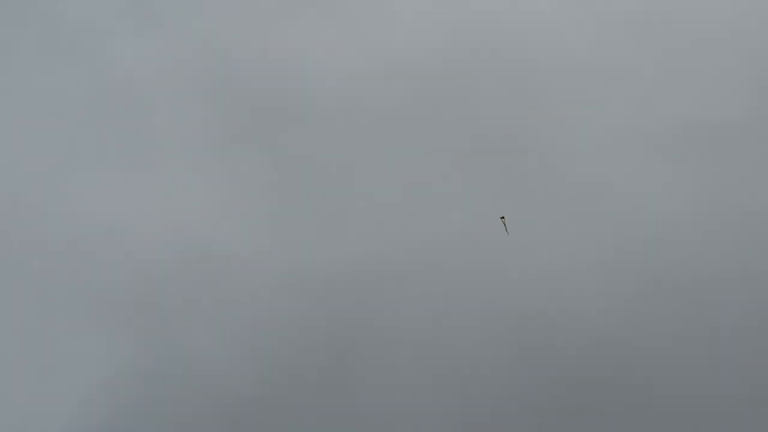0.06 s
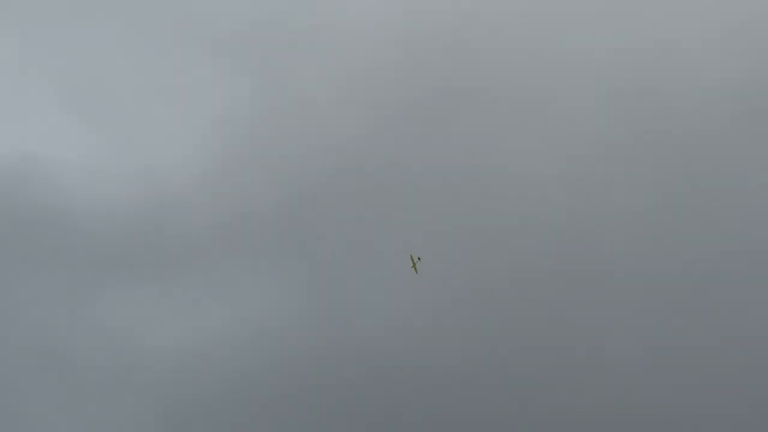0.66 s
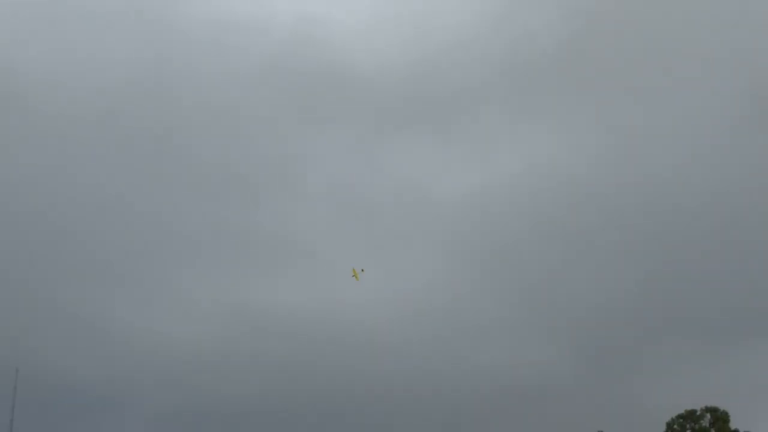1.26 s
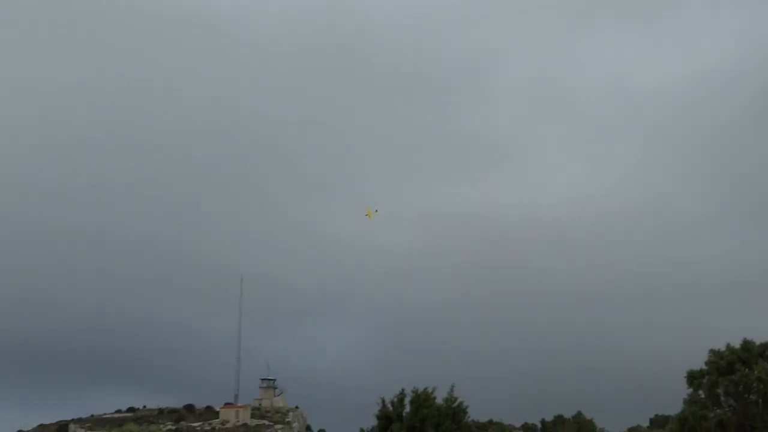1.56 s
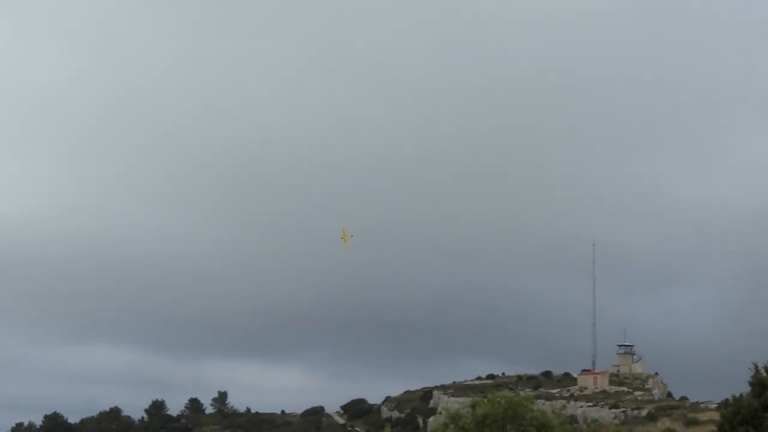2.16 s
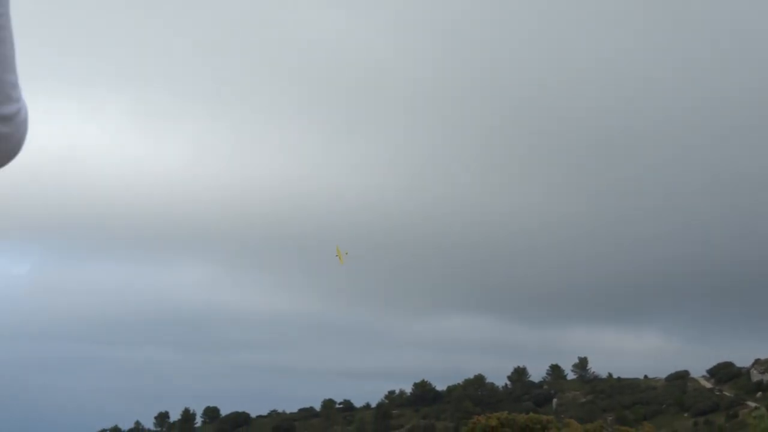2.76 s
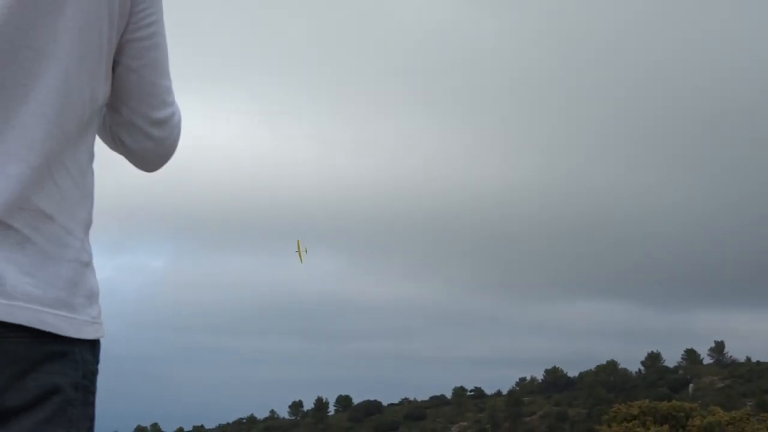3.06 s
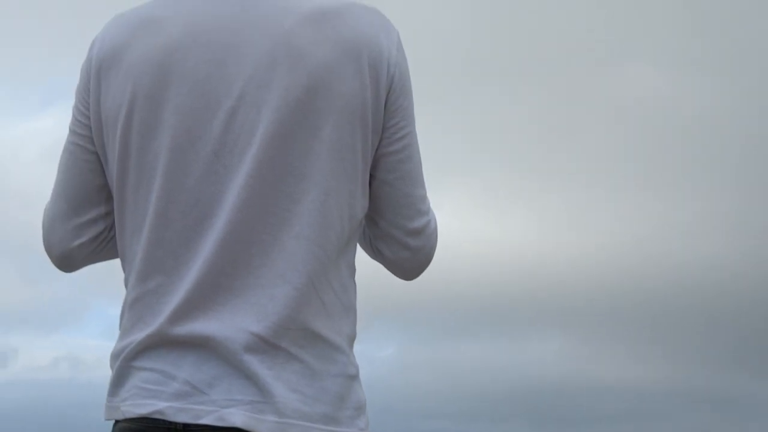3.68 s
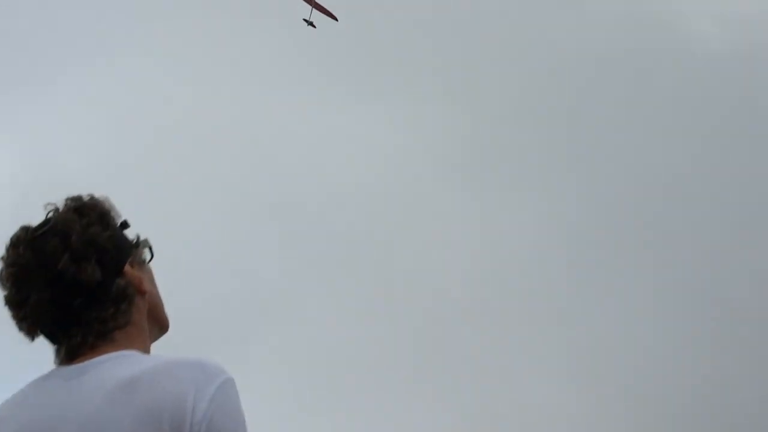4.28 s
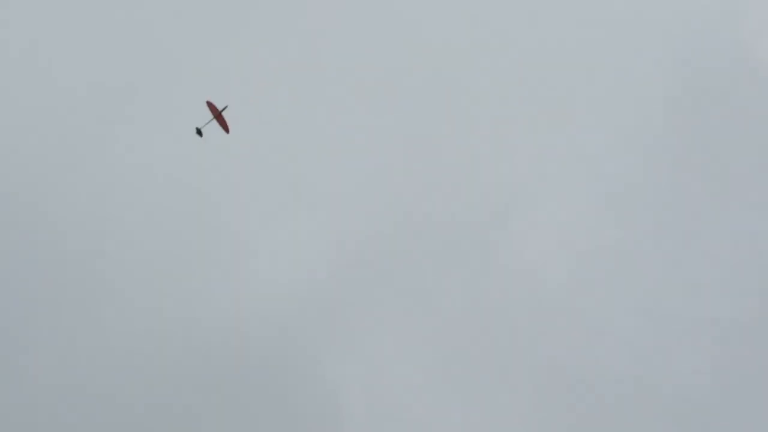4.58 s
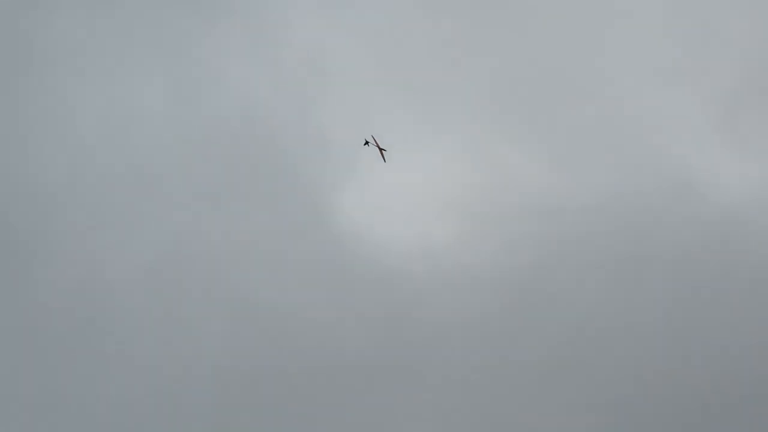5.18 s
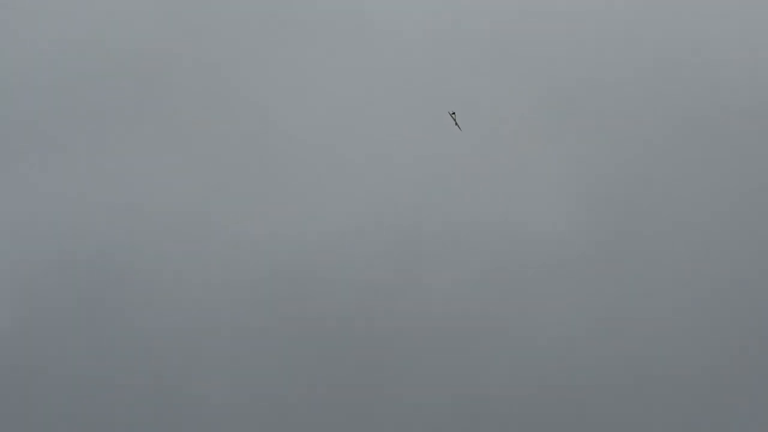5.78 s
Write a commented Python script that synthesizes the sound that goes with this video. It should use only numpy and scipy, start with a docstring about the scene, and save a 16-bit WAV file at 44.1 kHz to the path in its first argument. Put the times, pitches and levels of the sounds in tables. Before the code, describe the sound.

Outdoors on a quiet hilltop, short high whistles flicker through the soft swish of a distant model glider. A light rustle, shoe scuffs and clicking pebbles come from near the microphone. The glider's hiss surges, then swells into an overhead whoosh with a brief low hum and a few sharper stone clacks, before thinning back to faint whistles in the breeze.

```python
"""A model glider swoops past

A model glider circles over an open hilltop, dives, and whooshes past overhead with a brief low hum.
Swirls of air peel off its wings as a hiss that follows its speed and surges now and then; slots in
its body whistle thinly. Close by, over a faint breeze, come a soft shuffling rustle, shoe scuffs
and small dry clacks, probably loose stones underfoot."""
import sys
import numpy as np
from scipy import signal
from scipy.fft import rfft, irfft, next_fast_len
from scipy.io import wavfile
from scipy.ndimage import uniform_filter1d, map_coordinates

SR = 44100
rng = np.random.default_rng(int(sys.argv[2]) if len(sys.argv) > 2 else 0)


def inscribe(sig):
    """Save sig as 16-bit PCM at rate SR to the path in sys.argv[1].

    A 1-D sig is mono; a 2-D sig holds one channel per row.
    Samples are clipped to [-1, 1] before scaling.
    """
    pcm = np.round(np.clip(np.atleast_2d(sig).T, -1, 1) * 32767)
    wavfile.write(sys.argv[1], SR, pcm.astype(np.int16))


N = 266231

# swirls off the wings as the glider circles, dives and climbs (time [s], level [dB], centre [Hz])
SWIRLS = [(0.0, -56, 3440), (0.33, -64, 3630), (0.53, -55.5, 3210), (0.85, -67, 2990), (1.16, -57, 3220),
          (1.35, -56.5, 4000), (1.7, -66, 3560), (2.0, -67.5, 4360), (2.24, -61, 3850), (2.48, -72.5, 3970),
          (2.7, -54.5, 3330), (2.9, -55, 4070), (3.45, -46.5, 4150), (3.6, -55.5, 4180), (3.8, -73.5, 4080),
          (4.0, -54.5, 3800), (4.25, -49, 3590), (4.45, -48.5, 4000), (4.8, -51.5, 3400),
          (4.97, -54.5, 3210), (5.27, -56.5, 3190), (5.5, -77.5, 2950), (5.7, -53, 2920), (6.04, -63, 3150)]
# tone colour of the swirls when centred on SWIRL_HZ (frequency [Hz], level [dB])
SWIRL_COLOUR = [(1200, -40), (2100, -21.5), (2550, -13.5), (2900, -4.5), (3300, 0.5), (3900, -1.5),
                (4500, -11.5), (5300, -22), (7000, -26), (11000, -73)]
# hiss of rough air along the glider's skin (time [s], relative level [dB], treble lift [dB/octave])
HISS = [(0.0, -64, 7), (0.14, -65.5, 15), (0.34, -68.5, 17), (0.48, -74, 16), (1.08, -77.5, 22),
        (1.3, -63.5, 5), (1.62, -78, 20), (2.0, -75.5, 14), (2.2, -62, -4), (2.65, -55, -6),
        (3.3, -52, -2.5), (3.47, -44.5, 4), (3.62, -55.5, 4), (3.8, -63, -8.5), (4.2, -49.5, -2.5),
        (4.37, -40.5, 15), (4.55, -40, 12), (4.7, -45, 4.5), (4.82, -42.5, -1), (5.0, -50, 3),
        (5.2, -55, 5.5), (5.45, -64.5, 20), (6.04, -65.5, 7.5)]
# tone colour of that hiss (frequency [Hz], level [dB])
HISS_COLOUR = [(2500, -58), (4200, -4), (5000, 3), (5600, 2), (6400, -0.5), (7200, -6), (7900, -10.5),
               (9200, -14), (10200, -24.5), (11500, -35), (13000, -44), (16000, -76)]
# brief swells and dips, probably as the glider banks (time [s], half length [s], change [dB])
SURGES = [(0.423, 0.047, -8.5), (0.753, 0.022, 2), (0.923, .025, 4), (0.99, 0.037, 5.5),
          (1.093, 0.042, -6.5), (1.53, 0.037, -4.5), (1.966, 0.017, 4.5), (2.047, 0.041, -8),
          (2.213, 0.017, 2), (2.486, 0.044, -2), (2.585, .025, 4), (2.674, 0.0098, 4), (2.735, 0.01, -6),
          (2.835, 0.024, 1.5), (2.882, 0.014, -4.5), (2.924, 0.029, 5), (3.036, 0.018, 0.5),
          (3.12, 0.06, -8.5), (3.183, 0.018, 8), (3.345, 0.019, -4.5), (4.055, 0.041, -0.5),
          (4.271, 0.028, 2), (4.323, 0.011, -5), (4.75, 0.013, -4), (4.806, 0.025, 2.5), (5.136, 0.021, -4),
          (5.234, 0.024, 6), (5.41, 0.051, -5)]
# faint low rush, with a soft shuffling rustle from about 2 to 4 s, probably feet or clothing
# (time [s], level [dB], bass lift [dB/octave])
FAINT_RUSH = [(0.0, -65.5, 0), (0.8, -71.5, -4.5), (1.33, -65.5, -5.5), (1.65, -70.5, -4.5),
              (2.1, -66.5, 1.5), (2.8, -67.5, 2), (3.3, -69.5, 1), (3.75, -73, 3.5), (4.2, -79, -2.5),
              (4.9, -70, -2.5), (5.3, -70, -2), (6.04, -70, -5)]
# tone colour of the rush, also used for a stone's scatter (frequency [Hz], level [dB])
RUSH_COLOUR = [(30, -60), (100, -38), (180, -21.5), (350, -11.5), (600, -5.5), (850, -5), (1250, 2.5),
               (1700, 1.5), (2300, 3.5), (3300, -4), (5000, -2.5), (10000, -58)]
# how alike the glider sounds in both ears (frequency [Hz], likeness [0 to 1])
GLIDER_LIKENESS = [(100, 0.99), (300, 1), (750, 0.81), (1300, 0.93), (2500, 0.93), (4000, .982), (6500, 1),
                   (9000, 1), (12000, 0.75)]
# thin gliding whistles, and one brief low hum as the glider passes overhead
# (start [s], length [s], first pitch [Hz], glide [Hz], level [dB])
WHISTLES_AND_HUM = [(0.0, 0.29, 3346, -64.5, -57), (0.06, 0.23, 2410, 39, -68),
                    (0.066, 0.094, 3660, 66, -60), (0.105, 0.1, 5160, 0, -57.5), (0.2, 0.12, 5120, 11, -69),
                    (0.2, 0.23, 3730, -20, -63), (0.317, 0.067, 3700, -22, -57.5),
                    (0.419, 1.32, 4660, -10.5, -65.5), (0.46, 0.11, 4640, 22, -63.5),
                    (0.66, 0.15, 2898, -54, -55), (0.75, 0.15, 2717, 8, -59.5), (0.8, 0.17, 2870, 73, -55),
                    (0.883, 0.11, 4640, 18, -55.5), (1.129, 0.097, 4610, -28, -58.5),
                    (1.259, 0.15, 4630, 152, -57.5), (1.3, 0.084, 3770, 86, -52),
                    (1.366, 0.064, 5300, 30, -61.5), (1.415, 0.073, 3830, -51, -55),
                    (1.448, 0.16, 4720, -40, -69.5), (1.606, 0.1, 3440, -100, -62.5),
                    (2.17, 0.21, 5130, 138, -66), (2.38, 0.063, 5430, 60, -62),
                    (2.49, 0.1, 5540, -160, -60.5), (2.662, 0.09, 5430, 32, -60),
                    (2.75, 0.062, 5550, 16, -53.5), (3.455, 0.13, 6230, -100, -53),
                    (3.447, 0.24, 3200, 41, -69.5), (3.616, 0.19, 6190, -39, -65),
                    (3.685, 0.16, 5560, -140, -72), (4.316, 0.24, 280, -36.5, -69),
                    (4.83, 0.14, 3254, -43, -52), (4.918, 0.15, 3060, 38, -58.5),
                    (4.891, 0.19, 5100, -69, -54.5), (5.16, 0.138, 4970, -200, -55.5),
                    (5.2, 0.11, 2290, -43, -56.5), (5.28, 0.13, 2207, -45, -58.5),
                    (5.276, 0.15, 3730, -82, -62), (5.29, 0.11, 2840, 57, -62),
                    (5.433, 0.12, 5440, -25, -62.5), (5.46, 0.53, 5140, 50, -65),
                    (5.5, 0.15, 4880, -220, -62.5), (5.621, 0.079, 4630, -20, -59),
                    (5.493, 0.17, 1790, -17, -64.5), (5.587, 0.097, 1773, 34, -56.5),
                    (5.668, 0.16, 2897, 0, -54.5), (5.683, 0.2, 2650, 12, -54.5),
                    (5.88, 0.24, 3275, -32, -61), (5.962, 0.16, 2465, -65, -52)]
# tone colour of the breeze (frequency [Hz], level [dB])
BREEZE_COLOUR = [(25, -25), (70, -7), (160, -2.5), (300, -5), (550, 3), (1100, 7.5), (2000, 4), (4000, -14),
                 (8000, -12), (12000, -17.5), (16000, -18.5)]
# how alike the breeze sounds in both ears (frequency [Hz], likeness [0 to 1])
BREEZE_LIKENESS = [(30, 0.47), (110, 1), (300, 0.61), (700, 0.65), (1500, 0.5), (4000, 0.2), (12000, 0.88)]
# balance of the glider and breeze (frequency [Hz], left minus right [dB])
SKY_BALANCE = [(300, -.3), (800, 0.4), (1300, 1), (2300, -0.91), (3400, -0.6), (4800, .3), (7000, 0),
               (12000, 0.22)]
# stone hits (time [s], relative knock [dB], relative grit [dB], favoured pitch [Hz],
# left minus right [dB])
CLACKS = [(1.791, -50, -42, 2350, -3), (1.822, -58, -57, 1830, -1), (1.9, -42.5, -42, 1030, 0.5),
          (2.03, -57.5, -55.5, 1270, -1), (2.271, -64, -68, 1210, 2), (2.279, -66, -68, 1200, -5),
          (2.337, -58, -53, 1220, -3), (2.457, -49, -35, 1450, 1), (2.529, -52, -68, 1470, 3),
          (2.69, -44.5, -37.5, 1750, 1.5), (2.81, -52, -65, 2570, 4), (3.12, -58, -43.5, 2300, -3),
          (3.171, -39, -34.5, 2650, -1.5), (3.282, -56, -47, 1370, -1), (4.006, -41, -31, 1280, 0.5),
          (4.352, -34, -27.5, 1800, 4), (4.391, -28.5, -23, 1880, 1.5), (4.512, -37.5, -40, 1310, 4),
          (4.544, -35.5, -37, 2980, 8), (4.547, -42, -24.5, 553, 1.5)]
# the tones a stone rings with (base pitch [Hz], relative level [dB], time to fade by 60 dB [s])
STONE_TONES = [(371, -23.5, 0.18), (596, -9.5, 0.078), (817, -4.5, 0.028), (1034, -3.5, 0.034),
               (1281, -2.5, 0.04), (1570, -3.5, 0.021), (1950, 0.5, 0.024), (2220, 11.5, 0.006),
               (3354, 2, 0.018)]
# tone colour of grinding grit (frequency [Hz], level [dB])
GRIT_COLOUR = [(600, -52), (2000, 13.5), (3200, 10), (5000, 14), (8000, 7.5), (10500, -2), (13000, -15.5),
               (16000, -29)]
# how alike stones and scuffs sound in both ears (frequency [Hz], likeness [0 to 1])
GROUND_LIKENESS = [(200, 0.99), (450, 1), (850, 0.44), (1300, 0.74), (2200, 0.64), (3000, 0.69),
                   (5000, 0.96), (12000, 0.88)]
# balance of the stones and scuffs (frequency [Hz], left minus right [dB])
GROUND_BALANCE = [(300, 0), (550, -3), (900, 3.5), (1200, 1.5), (1700, -2), (2300, -3), (3100, -5.5),
                  (5000, -2), (12000, 1)]
# scuffs of a sole (time [s], level [dB], length [s], centre [Hz])
SCUFFS = [(1.947, -68.5, 0.078, 580), (2.119, -66.5, 0.081, 750), (2.259, -72, 0.037, 306),
          (2.267, -56.5, 0.044, 1244), (2.34, -52, 0.021, 1224), (2.343, -66, 0.042, 358),
          (2.451, -53.5, 0.046, 1460), (2.53, -55, 0.018, 1390), (4.292, -64.5, 0.032, 387),
          (4.312, -57.5, 0.18, 694), (4.348, -52, 0.036, 371), (4.387, -50, 0.039, 382),
          (4.546, -40.5, 0.018, 586), (4.547, -50, 0.031, 354), (4.694, -58, 0.016, 230),
          (4.696, -56, 0.026, 550)]
# tone colour of a scuff centred on SCUFF_HZ (frequency [Hz], level [dB])
SCUFF_COLOUR = [(30, -24), (110, -20), (220, -12.5), (310, -2), (360, 13.5), (430, -3), (560, -2.5),
                (1000, -30), (3000, -52)]

SWIRL_HZ, SCUFF_HZ = 3600, 360
FRAME, HOP = 1024, 256  # air noise is built in short overlapping frames: length and step in samples
FRAME_S = np.arange(N // HOP + 5)[:, None] * HOP / SR
BIN_HZ = np.fft.rfftfreq(FRAME, 1 / SR)


def gain_of(db):
    """Turns decibels into a number to multiply a sound by."""
    return 10 ** (np.asarray(db) / 20)


def read(points, hz):
    """Looks up a table at any frequency, with octaves evenly spaced."""
    known_hz, value = np.transpose(points)
    return np.interp(np.log(hz + 1), np.log(known_hz + 1), value)


def follow(rows, t):
    """Looks up a table's columns at times t."""
    times, *columns = np.transpose(rows)
    return [np.interp(t, times, column) for column in columns]


def add(mix, start, sound):
    """Mixes in a stereo sound at a start time in seconds."""
    part = mix[:, max(round(start * SR), 0):][:, :sound.shape[1]]
    part += sound[:, :part.shape[1]]


def evened(x):
    """Scales a signal to an average strength (rms) of 1."""
    return x / np.sqrt(np.mean(x ** 2) + 1e-20)


def wander(count, hz, rate=SR):
    """A smooth random wobble, moving up to about hz times a second."""
    size = next_fast_len(count + int(rate))
    freqs = np.fft.rfftfreq(size, 1 / rate)
    spectrum = rfft(rng.standard_normal(size)) / (1 + (freqs / hz) ** 2)
    return evened(irfft(spectrum, size))[:count]


def ear_pair(shape, hz, likeness):
    """Random spectra for two ears, partly alike."""
    a, b, c, d = rng.standard_normal((4, *shape))
    same = np.clip(read(likeness, hz), -1, 1)
    mid = (a + 1j * b) * np.sqrt(1 + same)
    side = (c + 1j * d) * np.sqrt(1 - same)
    return np.array([mid + side, mid - side])


def air(colour_db, level_db, likeness):
    """Stereo noise whose tone colour and level can change frame by frame."""
    colour = gain_of(colour_db)
    colour = colour / np.sqrt(np.mean(colour ** 2, axis=-1, keepdims=True))
    spectra = ear_pair((len(FRAME_S), len(BIN_HZ)), BIN_HZ, likeness) * colour * gain_of(level_db)
    _, noise = signal.istft(spectra.swapaxes(1, 2), nperseg=FRAME, noverlap=FRAME - HOP)
    return noise[:, :N] * np.sqrt(3 / 2 / FRAME)


def surge(t):
    """The brief swells and dips of the swish, in dB."""
    return sum(db * np.exp(-((t - time) / half) ** 2) for time, half, db in SURGES)


def low_rush(t, overhead_s=4.53, peak_db=-47, rise_db_per_s=39.5, fall_db_per_s=13):
    """Level and bass lift of the rush: faint until the wake (air stirred by the glider) sweeps by."""
    since = t - overhead_s
    faint_db, faint_bass = follow(FAINT_RUSH, t)
    wake_db = peak_db + np.minimum(rise_db_per_s * since, -fall_db_per_s * since)
    wake_bass = 6.5 * np.exp(-(since / 0.24) ** 2)
    return np.maximum(wake_db, faint_db), faint_bass + wake_bass


def streaks(centre_hz):
    """Short-lived narrow peaks in the noise that slide in pitch with the glider's speed."""
    field = rng.standard_normal((len(FRAME_S), 2 * len(BIN_HZ)))
    field = uniform_filter1d(field, size=16, axis=0)
    field = evened(uniform_filter1d(field, size=3, axis=1))
    slide = (SWIRL_HZ / uniform_filter1d(centre_hz, size=60, axis=0)) ** 0.32
    frame, place = np.broadcast_arrays(np.arange(len(FRAME_S))[:, None], np.arange(len(BIN_HZ)) * slide)
    return map_coordinates(field, [frame, place], order=1, mode="nearest")


def glider(streak_db=4.5, flutter_db=1.5, smear_above_db=-50, widen_above_db=-56):
    """Wing swirls, skin hiss and low rush, all fluttering together as the sound crosses gusty air."""
    swirl_db, centre_hz = follow(SWIRLS, FRAME_S)
    hiss_db, treble = follow(HISS, FRAME_S)
    swirl_db, hiss_db = swirl_db + surge(FRAME_S), hiss_db + surge(FRAME_S)
    rush_db, bass = low_rush(FRAME_S)
    # fast and close, the streaks smear into an even rush
    peaks = streak_db * streaks(centre_hz) / np.sqrt(1 + gain_of(hiss_db - smear_above_db) ** 2)
    flutter = flutter_db * wander(len(FRAME_S), hz=20, rate=SR / HOP)[:, None]
    octave = np.log2(np.clip(BIN_HZ, 200, 11000))
    # airspeed, and motion toward or away from us (Doppler shift), slide the swirls' pitch
    swirl_colour = read(SWIRL_COLOUR, BIN_HZ * SWIRL_HZ / centre_hz)
    # in fast flight, finer swirls add up to 10 dB above the centre
    upper_side = np.clip(2 * (octave - np.log2(centre_hz)), 0, 1)
    swirl_colour += 10 * upper_side / (1 + gain_of(widen_above_db - hiss_db))
    hiss_colour = read(HISS_COLOUR, BIN_HZ) + treble * octave
    rush_colour = read(RUSH_COLOUR, BIN_HZ) - bass * octave
    swirls = air(swirl_colour + peaks, swirl_db + flutter, GLIDER_LIKENESS)
    hiss = air(hiss_colour + peaks, hiss_db - 1.5 + flutter, GLIDER_LIKENESS)
    rush = air(rush_colour + peaks, rush_db + flutter / 2, GLIDER_LIKENESS)
    return swirls + hiss + rush


def gliding_tone(length, pitch_hz, glide_hz, db, jitter=0.0055, shimmer_db=2.5):
    """A thin whistle or low hum swells, glides and fades; rough air shakes its pitch and strength."""
    t = np.arange(0, length, 1 / SR)
    hz = pitch_hz + glide_hz * t / length
    shaken_hz = hz * (1 + jitter * wander(2 * SR, hz=110)[:len(t)])
    turns = np.cumsum(shaken_hz) / SR
    strength = evened(gain_of(shimmer_db * wander(2 * SR, hz=45)[:len(t)]))
    swell = abs(np.sin(np.pi * t / length)) ** 0.46
    tone = np.sin(2 * np.pi * turns + np.array([[0.065], [-0.065]]))  # ears slightly out of step
    return gain_of(db) * strength * swell * evened(tone)


def breeze(level_db=-75):
    """Air drifting over the hilltop makes a faint, steady noise."""
    return air(read(BREEZE_COLOUR, BIN_HZ), level_db, BREEZE_LIKENESS)


def puff(colour, count):
    """A short stretch of stereo noise with the given tone colour."""
    hz = np.fft.rfftfreq(count, 1 / SR)
    spectra = ear_pair(hz.shape, hz, GROUND_LIKENESS) * gain_of(read(colour, hz))
    return evened(irfft(spectra, count))


def clacks(knock_rise_s=0.00073, grit_rise_s=0.0017, grit_fade_s=0.01, scatter_fade_s=0.1):
    """Each stone knocks with a few fast-dying tones, grinds briefly, and scatters off the ground."""
    out, t = np.zeros((2, N)), np.arange(4096) / SR
    base_hz, tone_db, fade_s = np.transpose(STONE_TONES)[:, :, None]
    knock_rise = 1 - np.exp(-(t / knock_rise_s) ** 2)
    grit_rise = 1 - np.exp(-(t / grit_rise_s) ** 2)
    # coming from below, the middle tones reach the two ears out of step
    same = np.clip(read(GROUND_LIKENESS, base_hz), -1, 1)
    ear_phase = np.sqrt(1 - same) * np.array([0.6, -0.6])[:, None, None]
    for start, knock_db, grit_db, pitch_hz, pan_db in CLACKS:
        # every stone has its own size, and favours tones near its own pitch
        hz = base_hz * rng.uniform(0.85, 1.03, base_hz.shape)
        weight_db = tone_db - 3.5 * np.log2(base_hz / pitch_hz) ** 2
        phase = 2 * np.pi * rng.random(base_hz.shape) + ear_phase * rng.choice([-1, 1], base_hz.shape)
        ring = (gain_of(weight_db - 60 * t / fade_s) * np.sin(2 * np.pi * hz * t + phase)).sum(1)
        ring /= np.sqrt(np.mean(ring[:, :SR // 200] ** 2))  # strength 1 over the first 5 ms
        scatter = puff(RUSH_COLOUR, len(t)) * gain_of(-12 - 60 * t / scatter_fade_s)
        knock = knock_rise * gain_of(knock_db + 2.5) * (ring + scatter)
        grind = grit_rise * puff(GRIT_COLOUR, len(t)) * gain_of(grit_db + 9.5 - 60 * t / grit_fade_s)
        pan = gain_of([[pan_db / 2], [-pan_db / 2]])
        add(out, start + 0.00056, pan * (knock + grind))
    # the clacks carry no bass below about 260 Hz
    return signal.sosfilt(signal.butter(2, 260, "highpass", fs=SR, output="sos"), out)


def scuffs():
    """A sole rubs the ground: a puff of noise that swells fast and dies."""
    out, t = np.zeros((2, N)), np.arange(SR // 4) / SR
    for start, db, length, centre_hz in SCUFFS:
        age = 5 * t / length  # loudest at age 1
        colour = np.array(SCUFF_COLOUR) * [centre_hz / SCUFF_HZ, 1]
        add(out, start, puff(colour, len(t)) * gain_of(db) * age * np.exp(1 - age))
    return out


def balanced(sound, balance):
    """Leans each frequency left or right, so each ear has its own tone colour."""
    size = next_fast_len(N + 4096)
    lean_db = read(balance, np.fft.rfftfreq(size, 1 / SR))
    gain = gain_of([lean_db / 2, -lean_db / 2])
    return irfft(rfft(sound, size) * gain, size)[:, :N]


def scene():
    """Mixes the glider, its whistles and hum, and the breeze with the stones and scuffs."""
    flight = glider()
    for start, length, pitch_hz, glide_hz, db in WHISTLES_AND_HUM:
        add(flight, start, gliding_tone(length, pitch_hz, glide_hz, db))
    sky = balanced(flight + breeze(), SKY_BALANCE)
    ground = balanced(clacks() + scuffs(), GROUND_BALANCE)
    return sky + ground


def record(dry, cutoff_hz=15800):
    """Removes the very highest treble."""
    lowpass = signal.firwin(511, cutoff_hz, window=("kaiser", 9), fs=SR)
    return signal.oaconvolve(dry, lowpass[None], "same")


dry = scene()
out = record(dry)
inscribe(out)
```